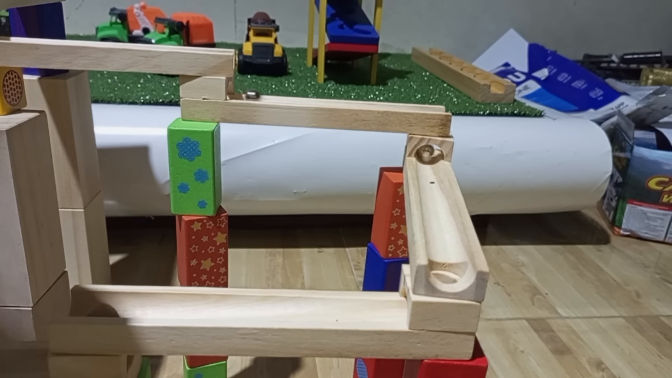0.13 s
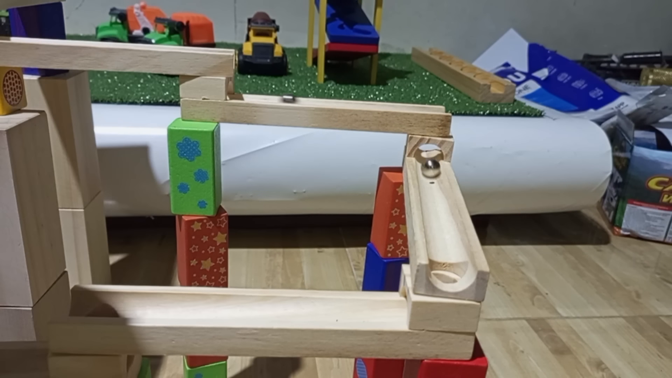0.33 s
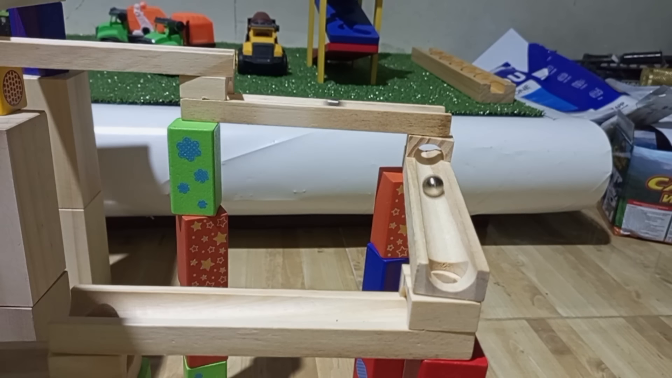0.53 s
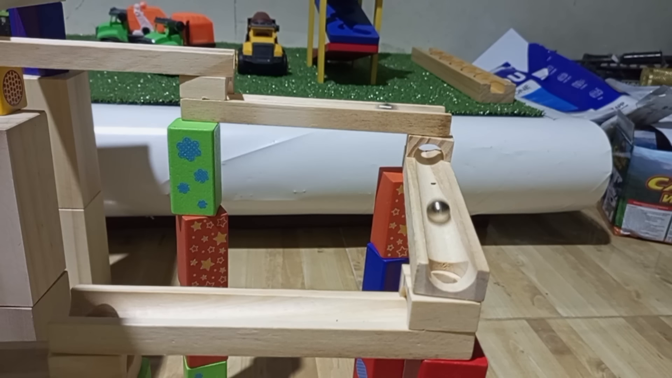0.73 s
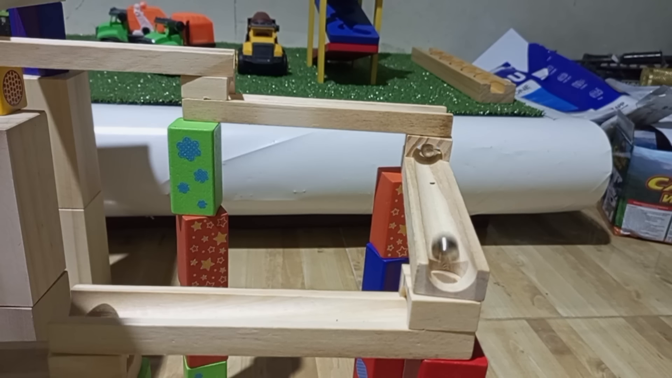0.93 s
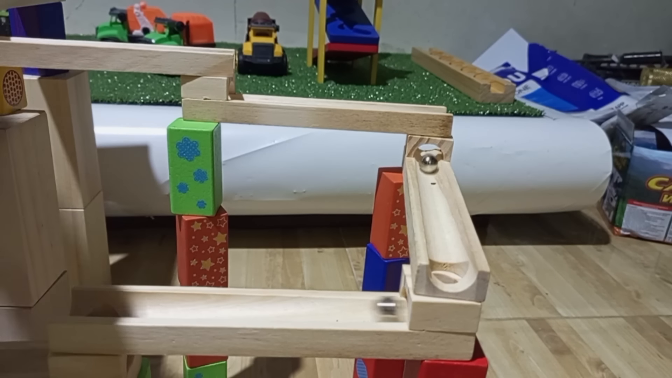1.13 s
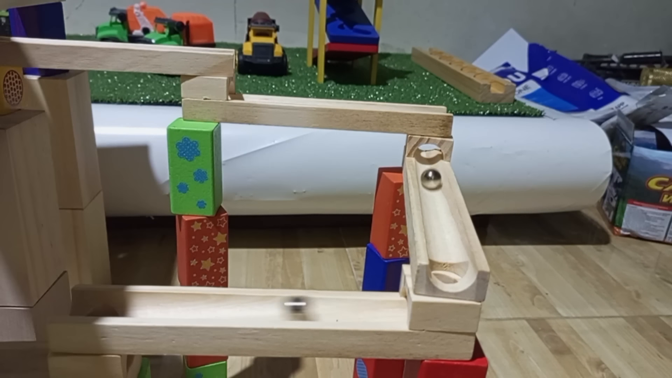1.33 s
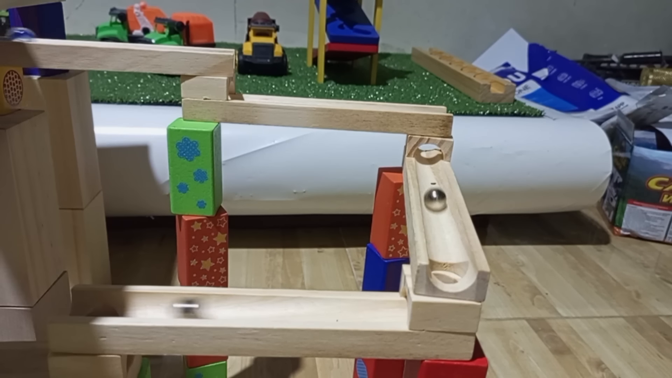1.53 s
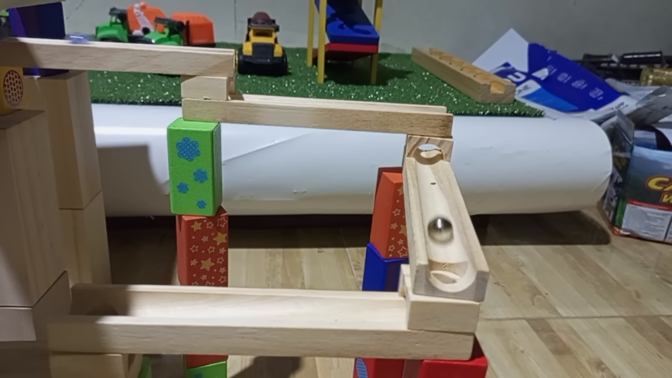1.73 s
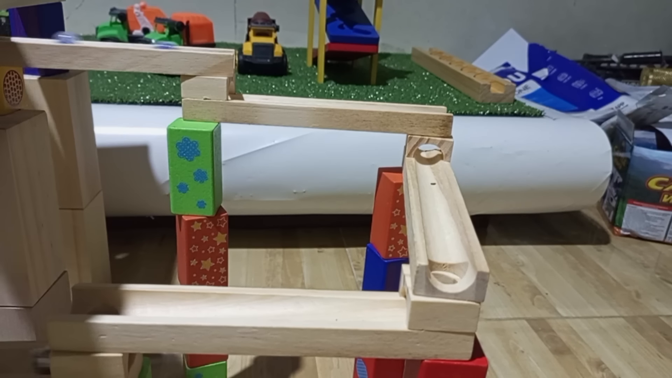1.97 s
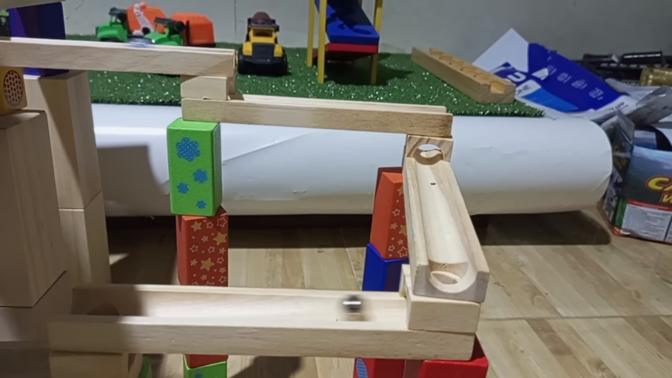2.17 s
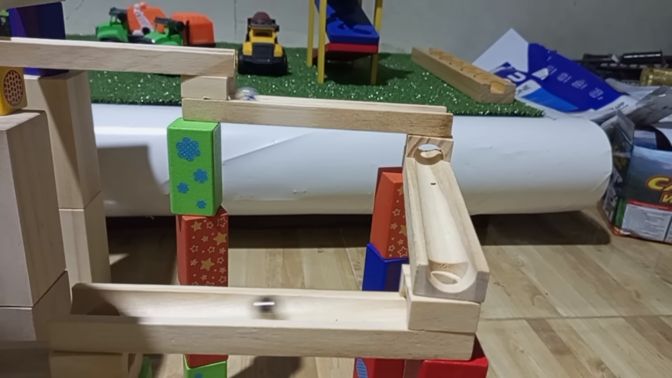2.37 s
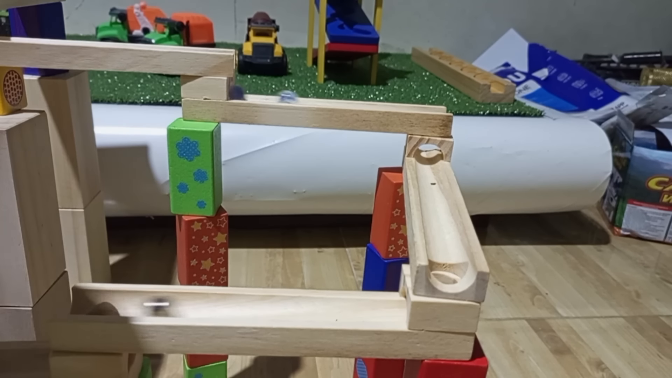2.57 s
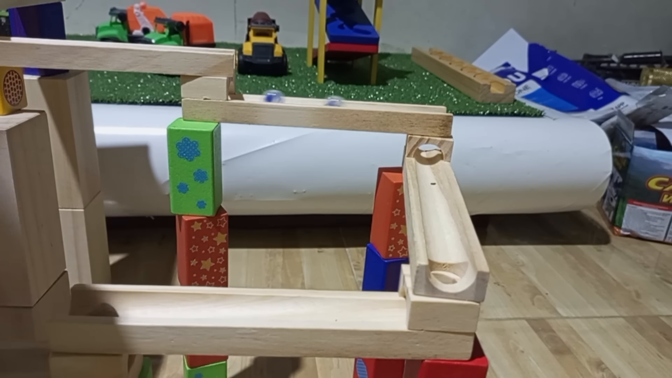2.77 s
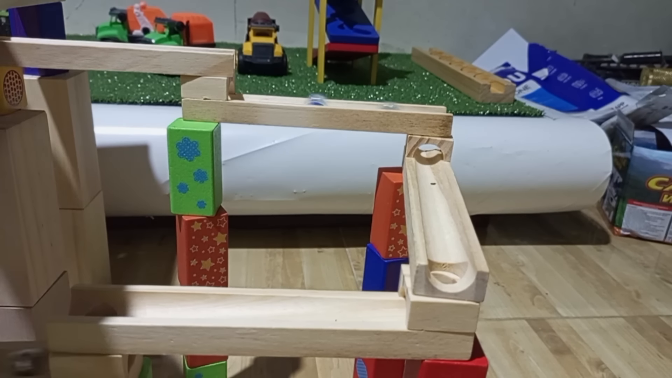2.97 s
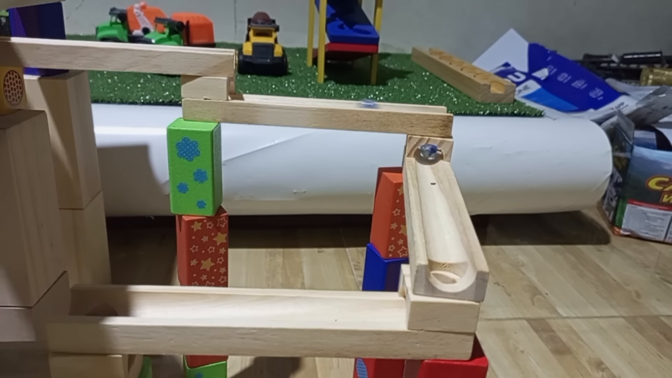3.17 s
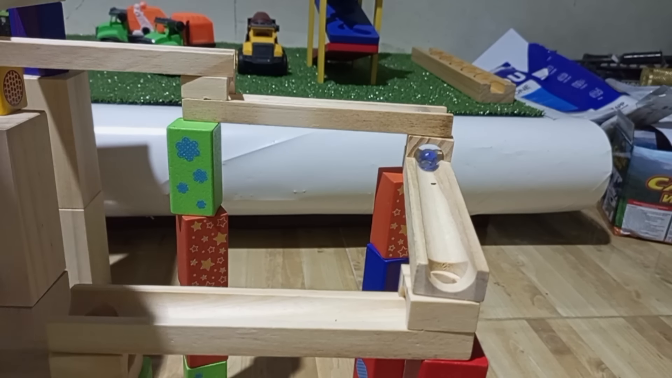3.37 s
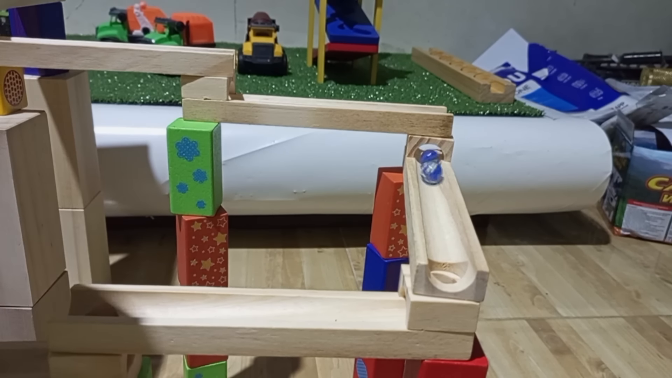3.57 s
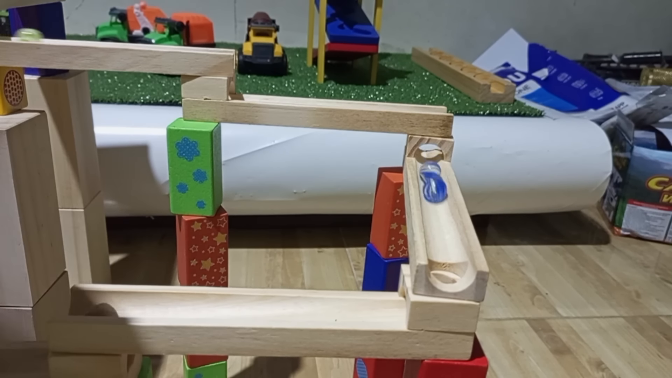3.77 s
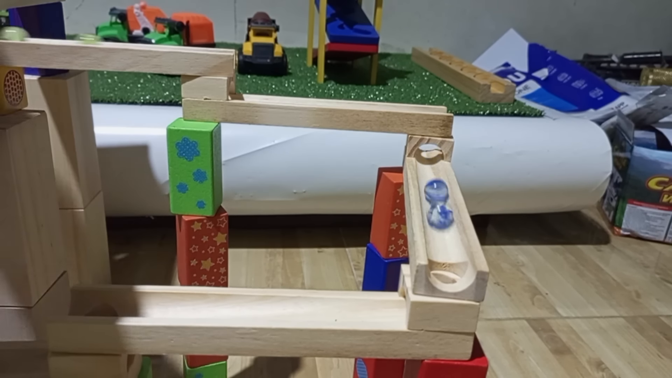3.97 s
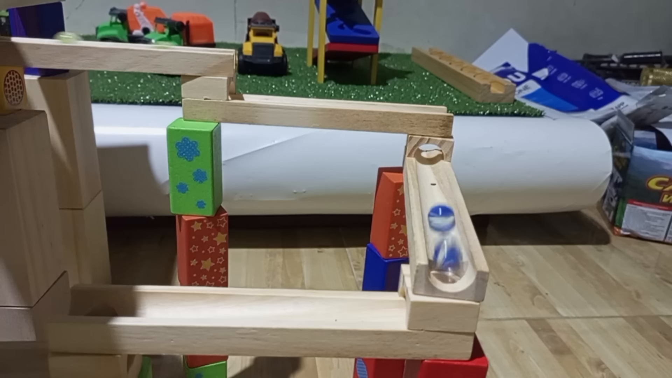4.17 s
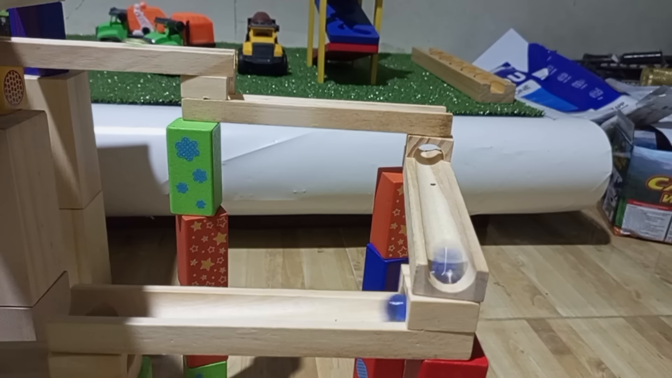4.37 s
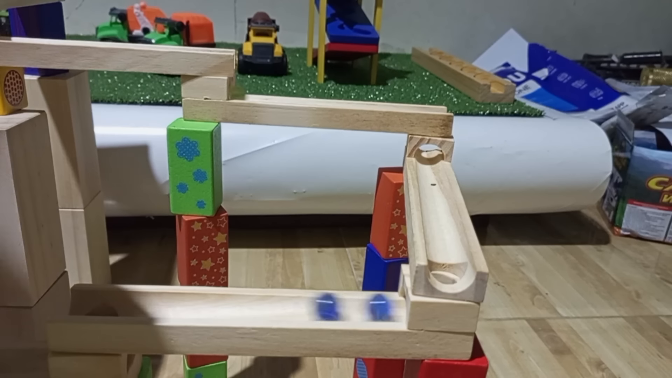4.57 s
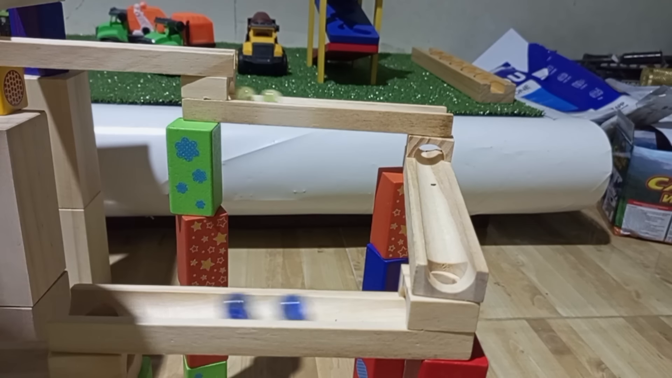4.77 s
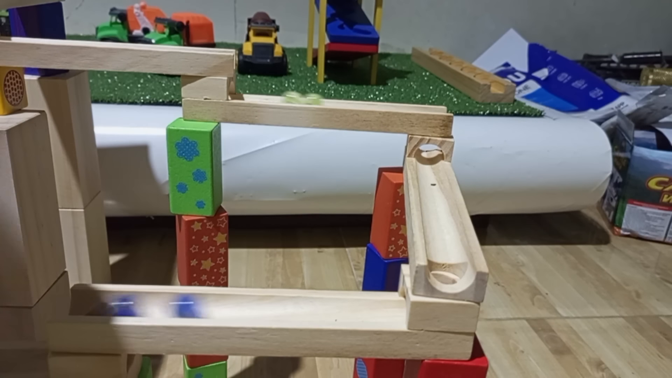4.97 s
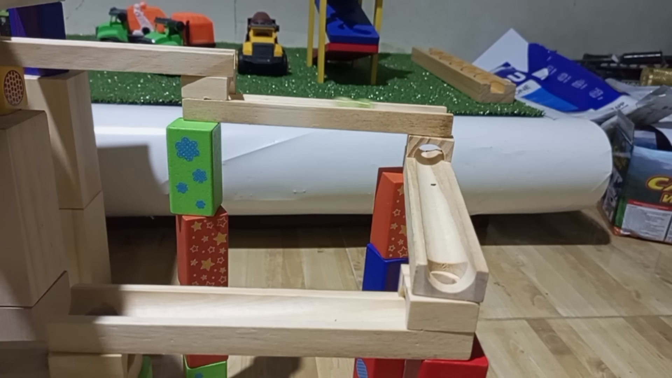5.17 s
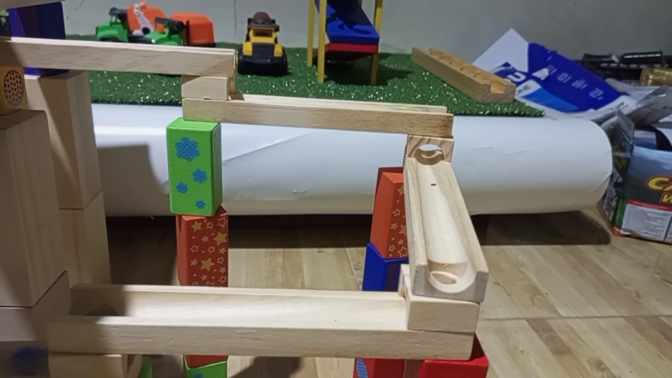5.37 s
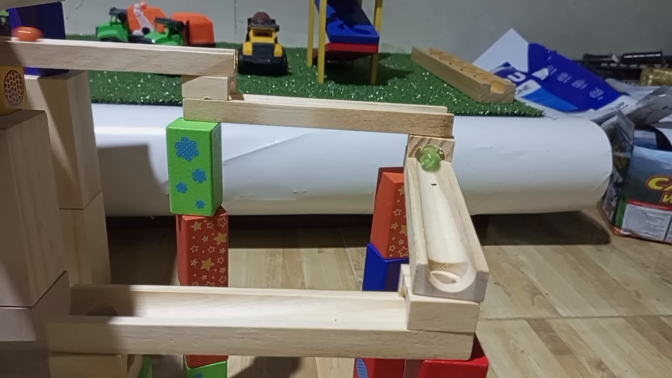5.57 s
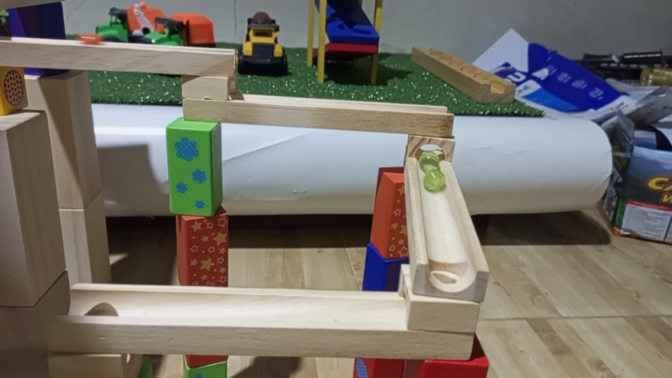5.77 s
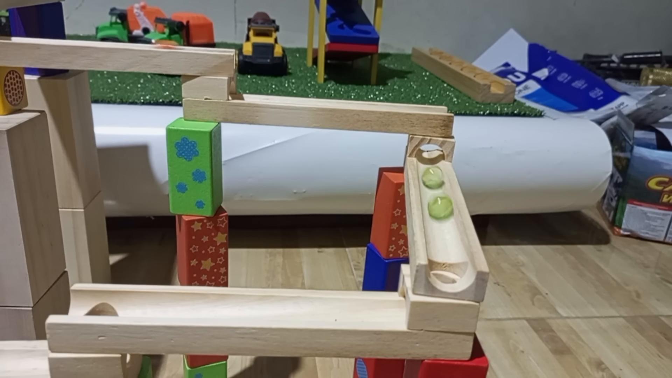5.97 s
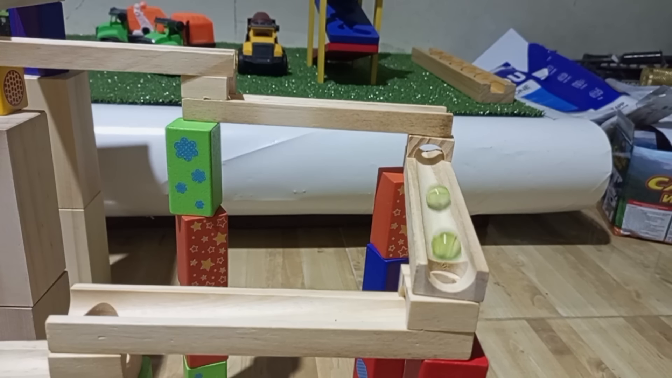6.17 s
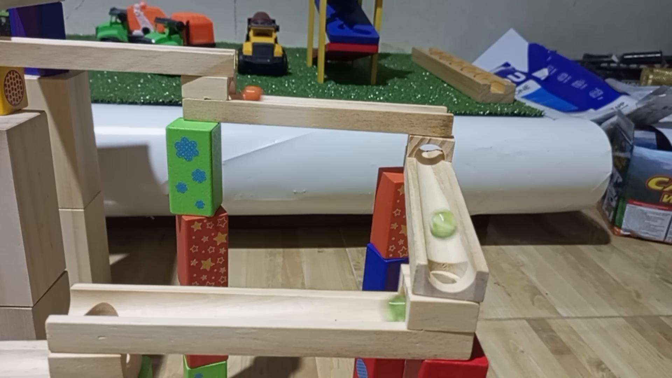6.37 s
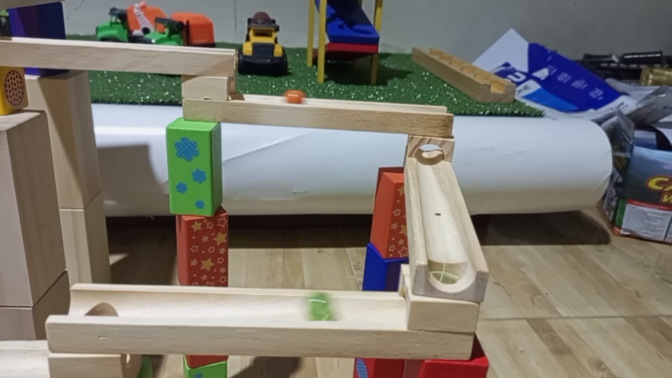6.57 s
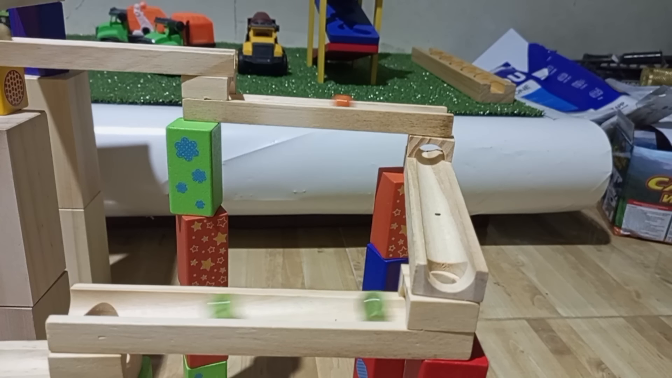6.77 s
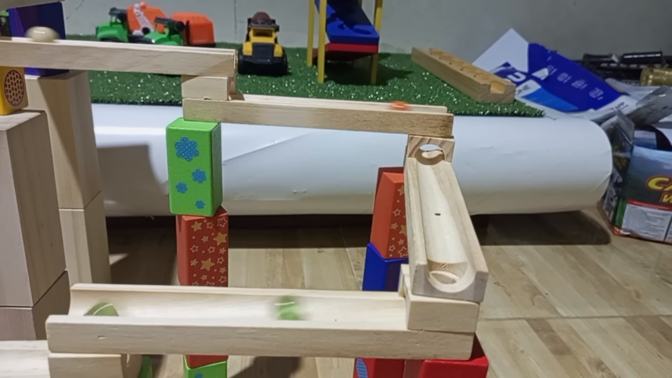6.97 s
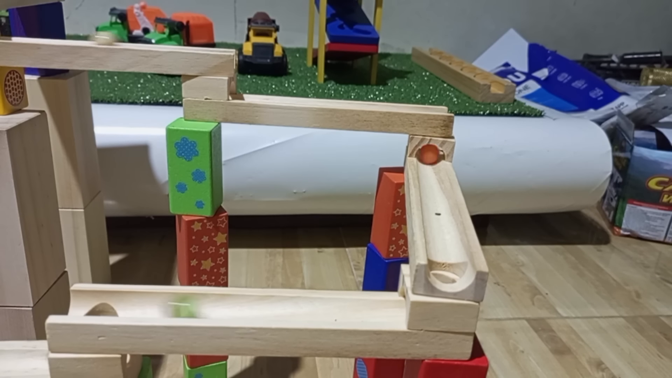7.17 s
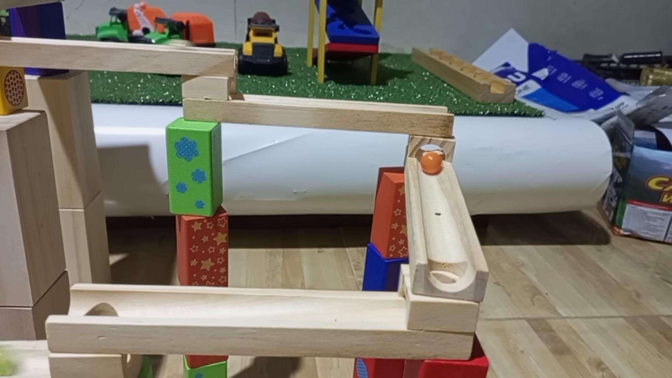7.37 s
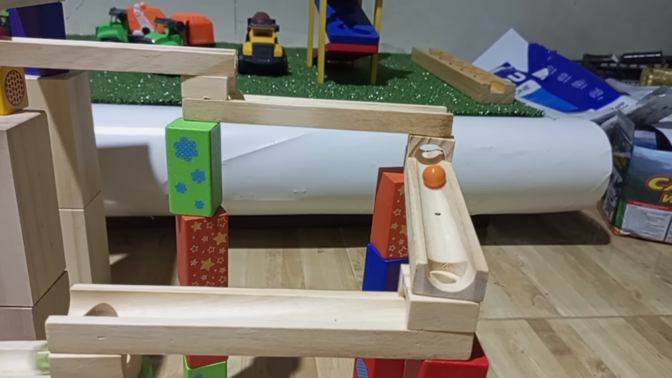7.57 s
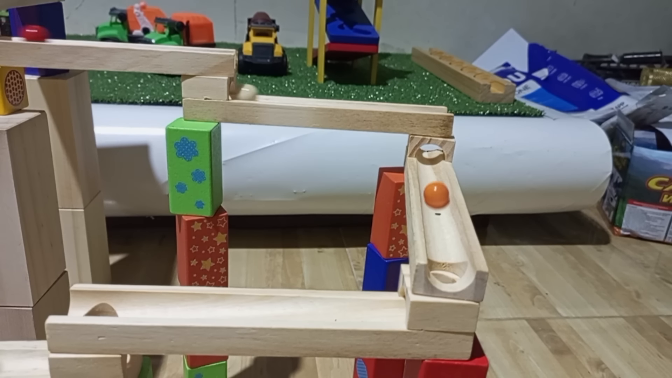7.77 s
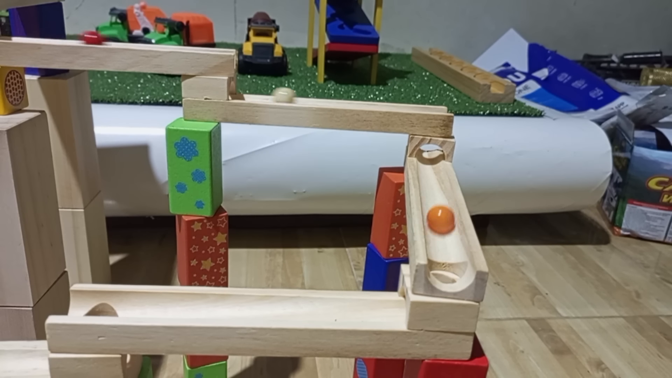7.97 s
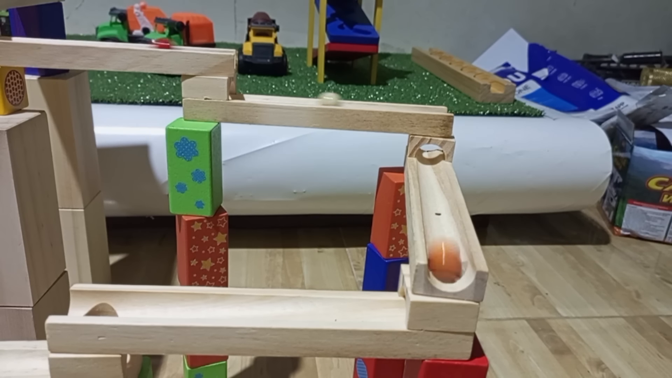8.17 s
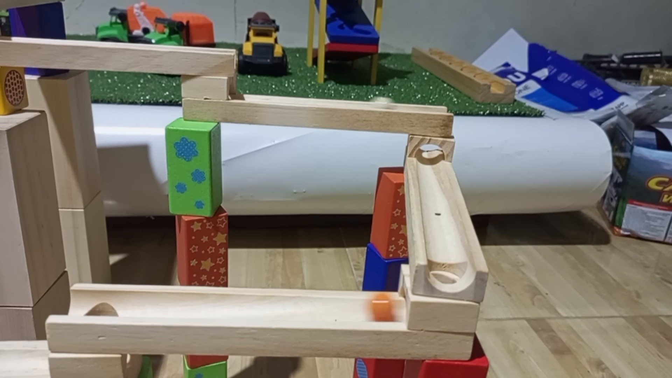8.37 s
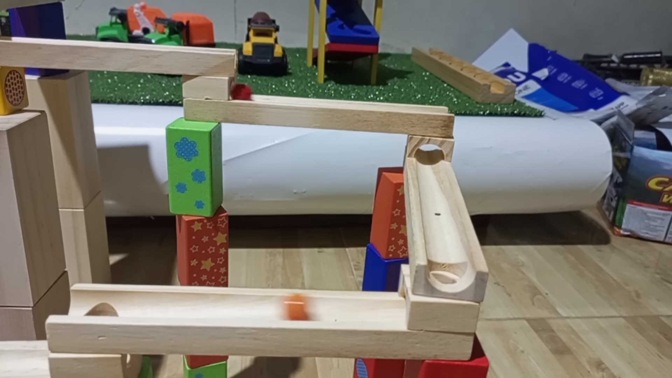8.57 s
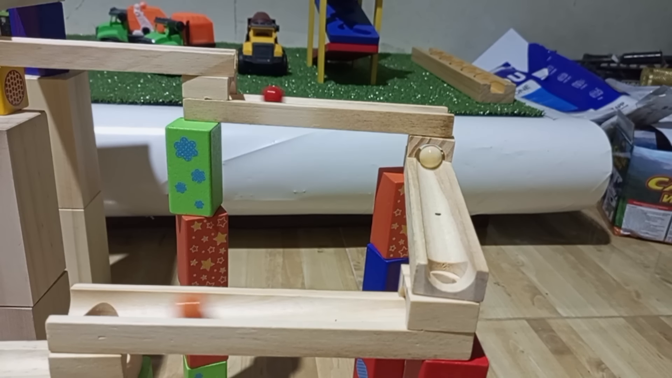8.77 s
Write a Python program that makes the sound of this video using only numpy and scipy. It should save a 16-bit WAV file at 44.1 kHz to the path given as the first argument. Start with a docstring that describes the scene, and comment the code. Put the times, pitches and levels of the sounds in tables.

```python
"""A hard-walled room, with glass marbles running down a wooden marble run.
Landings ring damped wood modes over noise; a low boom follows, with grazes and rebounds around each.
Bored blocks pop on one short air note, groove walls tap, and thin bright clicks join some landings.
Coloured noise makes the rolling rumble and the quiet of the room, and two rails drone.
Decaying noise is the room's answer, and the recorder's limiter holds the sharpest peaks down."""
import sys
import numpy as np
from scipy import signal
from scipy.fft import rfft, irfft, next_fast_len
from scipy.io import wavfile
from scipy.ndimage import uniform_filter1d, minimum_filter1d, map_coordinates

SR = 44100
rng = np.random.default_rng(int(sys.argv[2]) if len(sys.argv) > 2 else 0)


def generate_wav(signal):
    """Clip the signal to [-1, 1] and save it as 16-bit WAV at the path in sys.argv[1]."""
    frames = np.transpose(np.atleast_2d(signal))
    scaled = np.clip(frames, -1, 1) * 32767
    pcm = np.round(scaled).astype(np.int16)
    wavfile.write(sys.argv[1], SR, pcm)


N = 388515  # samples
HIT = np.arange(SR // 8) / SR  # time within one blow, s
DETUNE = 0.004  # spread of a mode's pitch, as a share of it

# marbles landing on the rails and blocks: start_s, level_db, part_index, contact_hardness_db
LANDINGS = [(0.237, -29.5, 0, -22.5), (0.2923, -28.5, 0, 6), (0.6428, -30, 0, -17.5),
            (0.7035, -31.5, 0, -9.5), (1.064, -15.5, 1, -14), (1.22, -24.5, 2, 2.5), (1.5895, -23, 2, 5.5),
            (1.729, -24, 1, 0), (1.7763, -17, 5, -4), (1.9738, -18, 1, -2), (2.1278, -25.5, 6, 2),
            (2.175, -21.5, 5, -13), (2.4385, -22.5, 4, -7.5), (2.6829, -17.5, 7, -5), (2.711, -25, 0, 3),
            (2.7737, -20, 5, -6.5), (2.8583, -35, 0, 9), (3.278, -25, 0, -0.5), (3.4438, -23.5, 2, 2),
            (3.6305, -18.5, 6, -1.5), (3.7058, -26, 2, 1.5), (4.3117, -16, 1, 1), (4.37, -21.5, 4, 1.5),
            (4.3859, -17.5, 4, 5), (4.487, -20.5, 1, 0.5), (4.543, -17.5, 6, 0), (4.62, -25, 4, -2.5),
            (4.763, -22.5, 3, 1), (5.1208, -22, 5, -2), (5.2306, -23.5, 4, -1.5), (5.319, -24.5, 2, -0.5),
            (5.4648, -24.5, 0, -1), (5.537, -19.5, 6, 1), (5.7116, -23.5, 5, -24), (5.7745, -23.5, 7, 0),
            (6.0114, -21.5, 7, 1), (6.1742, -25, 4, -4), (6.3314, -22, 1, 0), (6.367, -22.5, 1, -9),
            (6.4801, -22, 0, -0.5), (6.531, -20.5, 2, 4.5), (6.662, -20.5, 1, 0), (6.7103, -21.5, 6, 4.5),
            (6.9315, -26, 7, 2), (7.089, -23, 4, -6.5), (7.4254, -18, 5, -4.5), (7.439, -23.5, 2, -7),
            (7.545, -20.5, 4, -10), (7.964, -28.5, 3, -6.5), (8.3024, -20, 1, 1), (8.397, -20.5, 4, -13.5),
            (8.7519, -29, 6, -15)]
# how each part answers a blow: low_mode_db, ring_over_clatter_db, room_share_db, tower_boom_db
PART_VOICING = [(-6, -2, -9.5, -13), (-6.5, 4, -10, -29), (-3, 5, -10, -24), (0, 1, -9, -24),
                (-8.5, -4, -12.5, -25), (-7, -6.5, -10.5, -20), (-7, -8, -8.5, -21), (-8, -4.5, -10, -30)]
# spectrum of a glancing contact: frequency_hz, relative_level_db
GLANCING_SPECTRUM = [(60, -39), (200, -3.5), (700, -4.5), (2200, 4.5), (6000, -3.5), (8500, -33.5),
                     (14000, -36)]
# spectrum of a bright crack: frequency_hz, relative_level_db
CRACK_SPECTRUM = [(5000, -21), (7300, -14), (9000, -4.5), (10500, 5), (13700, -12), (15000, -8)]


def amp(db):
    """Decibels to gain."""
    return 10 ** (np.asarray(db) / 20)


def unit(x):
    """Scale to rms 1."""
    return x / np.sqrt(np.mean(x ** 2) + 1e-20)


def strike(x):
    """Scale a blow to rms 1 over its first hundredth of a second."""
    return x / np.sqrt(np.mean(x[:SR // 100] ** 2) + 1e-20)


def along(points, hz):
    """Read (Hz, value) points at any frequency, straight lines on a log axis."""
    point_hz, values = np.transpose(points)
    return np.interp(np.log(hz + 1), np.log(point_hz), values)


def coloured(size, spectrum):
    """Noise of rms 1, its white spectrum shaped to the given levels."""
    padded = next_fast_len(size)
    gain = amp(along(spectrum, np.fft.rfftfreq(padded, 1 / SR)))
    noise = irfft(rfft(rng.standard_normal(padded)) * gain, padded)
    return unit(noise[:size])


def wobble(rate):
    """A random curve of straight lines between knots, rate knots a second."""
    knots = rng.standard_normal(int(N * rate / SR) + 4)
    return map_coordinates(knots, [np.arange(N) * rate / SR], order=1)


def fade(t60, attack=0.00019):
    """Quick rise and exponential decay, both in seconds."""
    return amp(-60 * HIT / t60) * (1 - np.exp(-HIT / attack))


def mode(hz, t60, attack=0.0005):
    """One ringing resonance: a sine that dies exponentially."""
    return np.sin(2 * np.pi * hz * HIT) * fade(t60, attack)


def burst(spectrum, t60):
    """Many close, heavily damped modes, dying as noise."""
    return strike(coloured(len(HIT), spectrum) * fade(t60))


def cluster(modes, lo_hz, hi_hz, ring_db, ring_t60, dense_t60):
    """The leading modes of the wood ring among their damped neighbours."""
    band = [(lo_hz / 2, -45), (lo_hz, 0), (hi_hz, 0), (hi_hz * 1.425, -28), (hi_hz * 2, -55)]
    ring = np.zeros(len(HIT))
    # the marble's weight and the spot it hits vary each mode's level and pitch a little
    for hz in modes:
        level = amp(rng.normal(0, 1.7))
        ring += level * mode(hz * (1 + DETUNE * rng.normal()), ring_t60)
    return strike(amp(ring_db - 2.5) * strike(ring) + burst(band, dense_t60))


def room(x, gap=0.0055, build=0.0082):
    """The room's answer: noise dying at its own rate in each band, drawn anew for every sound."""
    # reverberation of the room: frequency_hz, t60_s
    reverberation = [(500, 0.61), (2000, 0.52), (5000, 0.56), (7000, 0.49), (15000, 0.48)]
    hz, t, grains = signal.stft(rng.standard_normal(SR * 2 // 3), SR, nperseg=256)
    decay = amp(-60 * t / along(reverberation, hz)[:, None])
    tail = signal.istft(grains * decay, SR, nperseg=256)[1]
    # the nearest walls answer first, after the gap (s)
    tail *= np.clip((np.arange(len(tail)) / SR - gap) / build, 0, 1)
    return signal.fftconvolve(x, tail / np.linalg.norm(tail))


def add(track, s, x):
    """Mix x into the track at time s; a sound begun earlier leaves only its tail."""
    start = round(s * SR)
    x, start = x[max(-start, 0):], max(start, 0)
    track[start:start + len(x)] += x[:max(N - start, 0)]


def knocks(room_db=6):
    """Each landing rings three groups of modes; hard contacts gain treble and crack, gentle ones are duller."""
    # the rails and blocks: low_mode_hz, main_mode_hz, then
    # two further modes of the part, in no fixed order: further_mode_hz, other_further_mode_hz
    part_modes = [(1594, 2580, 6900, 6600), (1675, 4200, 5530, 6900), (1888, 3770, 5600, 5200),
                  (2030, 3830, 4500, 6000), (2353, 3300, 5700, 6100), (1678, 2960, 4500, 3600),
                  (1568, 3800, 2400, 5830), (1950, 2680, 4780, 6300)]
    # spectrum of the tower's thud: frequency_hz, relative_level_db
    thud_spectrum = [(40, -49.5), (130, -18), (200, 0.5), (500, 1), (1100, 1), (1700, -5.5), (4000, -59.5)]
    usual_db = -24.5  # an ordinary landing
    thud_db, bass_lag = -13, 0.23  # dB the bass falls behind per dB of level
    crack_db, crack_grows = -20.5, 0.83  # dB the crack gains per dB of hardness
    # dB of room lost per dB of level (loud is near), and gained per dB of hardness
    room_lag, room_grows = 0.36, 0.1
    out = np.zeros(N)
    for s, db, part, hard_db in LANDINGS:
        low_hz, main_hz, *further_hz = part_modes[round(part)]
        low_db, ring_db, wet_db, _ = PART_VOICING[round(part)]
        force_db = db - usual_db
        low = amp(low_db) * cluster([low_hz], 1300, 2060, ring_db + 7, ring_t60=0.044, dense_t60=0.019)
        main = cluster([main_hz], 2450, 4090, ring_db, ring_t60=0.033, dense_t60=0.026)
        further = amp(hard_db) * cluster(further_hz, 4490, 6140, ring_db, ring_t60=0.025, dense_t60=0.02)
        crack = amp(crack_db + crack_grows * hard_db) * burst(CRACK_SPECTRUM, t60=0.019)
        thud = amp(thud_db) * burst(thud_spectrum, t60=0.078)
        bass = amp(-bass_lag * force_db) * (low + thud)
        blow = amp(db) * (main + further + crack + bass)
        add(out, s, blow)
        send_db = room_db + wet_db - room_lag * force_db + room_grows * hard_db
        add(out, s, amp(send_db) * room(blow))
    return out


def booms(rise_s=0.0088, t60=0.25, boom_grows=0.3):
    """A landing rocks the blocks underneath, harder contacts more: a low noise bloom after the knock."""
    # spectrum of the swaying tower of blocks: frequency_hz, relative_level_db
    tower_spectrum = [(60, -38.5), (150, -17.5), (195, 1), (300, -6), (450, -12.5), (1500, -54)]
    out, t = np.zeros(N), np.arange(SR // 3) / SR
    swell = amp(-60 * t / t60) * (1 - np.exp(-t / rise_s))
    for s, db, part, hard_db in LANDINGS:
        *_, boom_db = PART_VOICING[round(part)]
        level = amp(db + boom_db + boom_grows * hard_db)
        add(out, s, level * swell * coloured(len(t), tower_spectrum))
    return out


def rebounds(rel_db=-14, scatter_db=2.0, soonest=0.012, latest=0.055, count=2):
    """After each landing the marble skips between the groove walls: noise bursts at random delays (s)."""
    out = np.zeros(N)
    for s, db, *_ in LANDINGS:
        for delay in rng.uniform(soonest, latest, count):
            level = amp(db + rel_db + scatter_db * rng.normal())
            add(out, s + delay, level * burst(GLANCING_SPECTRUM, t60=0.016))
    return out


def grazes(rel_db=-17, scatter_db=2, lead_s=0.034, spread_s=0.0066):
    """Just before it lands, a marble brushes the edge it falls from: a soft noise burst."""
    out = np.zeros(N)
    for s, db, *_ in LANDINGS:
        touch_s = s - lead_s + spread_s * rng.normal()
        level = amp(db + rel_db + scatter_db * rng.normal())
        add(out, touch_s, level * burst(GLANCING_SPECTRUM, t60=0.025))
    return out


def pops(air_db=1.5, wood_db=-9, air_room_db=-13, wood_room_db=-2, mode_scatter_db=2.5):
    """The hollow sings one short note out of its hole, while the wood around it radiates into the room."""
    # marbles striking inside a bored block: start_s, level_db
    hollow_strikes = [(0.1345, -26), (0.147, -13), (0.9128, -32.5), (0.9699, -16.5), (1.9441, -33),
                      (3.1507, -37), (3.208, -15), (3.471, -16.5), (5.1976, -20.5), (5.4386, -29),
                      (5.4506, -26.5), (5.4896, -14), (5.5907, -13), (6.174, -20.5), (6.6335, -23.5),
                      (7.1293, -29.5), (7.1773, -16), (8.2646, -34), (8.591, -25), (8.686, -15.5)]
    # modes of the bored block, its air hollow first: frequency_hz, level_db, t60_s
    block_modes = [(3108, -0.5, 0.028), (2247, -22.5, 0.068), (1674, -26.5, 0.036), (3646, -17.5, 0.025),
                   (5104, -16.5, 0.032)]
    out = np.zeros(N)
    (air_hz, hollow_db, air_t60), *wood_modes = block_modes
    for s, db in hollow_strikes:
        note_hz = air_hz * (1 + DETUNE * rng.normal())
        air = amp(hollow_db) * strike(mode(note_hz, air_t60, attack=0.0027))
        wood = amp(wood_db) * burst(GLANCING_SPECTRUM, t60=0.018)
        for hz, mode_db, t60 in wood_modes:
            wood += amp(mode_db + rng.normal(0, mode_scatter_db)) * strike(mode(hz, t60))
        add(out, s, amp(db) * (amp(air_db) * air + wood))
        add(out, s, amp(db) * room(amp(air_room_db) * air + amp(wood_room_db) * wood))
    return out


def taps(ring_db=-1, room_db=-5):
    """A glancing touch rings one mode over a dull click."""
    # light bounces against the groove walls: start_s, level_db, mode_hz; the first row, at a negative time, is
    # an earlier landing begun before the scene, of which only the room's dying answer is heard
    wall_bounces = [(-0.11, -21, 3810), (1.1133, -26, 3960), (1.5468, -35.5, 1920), (1.7471, -25, 3330),
                    (1.826, -25, 3220), (2.023, -24.5, 1680), (2.4216, -30, 3920), (2.4883, -29, 4050),
                    (2.6536, -34, 2880), (2.6828, -22.5, 2290), (2.8333, -24, 2940), (3.168, -39.5, 3410),
                    (3.409, -35, 3460), (3.6032, -35.5, 3030), (3.6259, -23.5, 2870), (3.7498, -31.5, 3700),
                    (4.271, -27.5, 3160), (4.4211, -25.5, 4060), (4.4972, -27, 4180), (4.6642, -22.5, 3800),
                    (4.7062, -26, 4000), (4.7275, -25, 2330), (4.806, -26.5, 2010), (5.0885, -25, 3350),
                    (5.1703, -32, 3160), (5.185, -30.5, 3300), (5.2142, -25.5, 2960), (5.6554, -18.5, 1570),
                    (5.976, -26, 2410), (6.217, -27.5, 3990), (6.3142, -26, 2530), (7.0545, -33, 2610),
                    (7.099, -27.5, 5030), (7.3851, -25.5, 2630), (7.68, -30.5, 2020), (7.716, -23, 4440),
                    (7.761, -25, 2030), (8.0069, -33, 4400), (8.2886, -24.5, 4450), (8.3338, -27.5, 3540)]
    out = np.zeros(N)
    for s, db, hz in wall_bounces:
        ring = amp(ring_db) * strike(mode(hz, t60=0.033))
        tap = amp(db) * strike(ring + burst(GLANCING_SPECTRUM, t60=0.022))
        add(out, s, tap)
        add(out, s, amp(room_db) * room(tap))
    return out


def bright_clicks(room_db=2):
    """Thin bright clicks, most of them together with a landing: short treble noise that carries in the room."""
    # thin bright clicks, most of them together with a landing: start_s, level_db
    click_levels = [(1.22, -46.5), (1.7292, -41), (3.6304, -40), (5.195, -45), (5.537, -40), (7.0884, -46),
                    (7.3614, -45), (7.4237, -43.5), (7.775, -45)]
    out = np.zeros(N)
    for s, db in click_levels:
        click = amp(db) * burst(CRACK_SPECTRUM, t60=0.014)
        add(out, s, click)
        add(out, s, amp(room_db) * room(click))
    return out


def rolling(bumps_db=2.5):
    """The grain of the wood shakes the rolling marbles: uneven groove noise, and rails that drone."""
    # marbles rolling in the grooves: time_s, level_db
    roll_levels = [(0, -56), (1.4, -49.5), (2.6, -53.5), (4.1, -58), (4.5, -55), (6, -54.5), (8.8, -55.5)]
    # spectrum of the grooves: frequency_hz, relative_level_db
    groove_spectrum = [(40, -40), (100, -8.5), (175, 8.5), (260, 0), (800, -2), (1600, -22), (5000, -22),
                       (8000, -44.5)]
    # low drones, as a rolling marble shakes a whole rail: start_s, end_s, pitch_hz, level_db
    rail_drones = [(2.058, 3.252, 167, -53), (7.11, 8.903, 79.7, -58.5)]
    t = np.arange(N) / SR
    level_db = np.interp(t, *np.transpose(roll_levels)) + bumps_db * wobble(35)
    out = amp(level_db) * coloured(N, groove_spectrum)
    for start, end, hz, db in rail_drones:
        progress = np.clip((t - start) / (end - start), 0, 1)
        swell = np.sqrt(np.abs(np.sin(np.pi * progress)))
        phase = 2 * np.pi * hz * t
        # two slow random curves make the drone's level and phase wander
        drone = unit(wobble(9.2) * np.sin(phase) + wobble(8.3) * np.cos(phase))
        out += amp(db) * swell * drone
    return out


def quiet(level_db=-57):
    """The quiet of the room: steady coloured noise."""
    # spectrum of the quiet room: frequency_hz, relative_level_db
    quiet_spectrum = [(25, -9), (75, 6), (200, 12), (600, -7.5), (6000, -21.5), (9000, -35.5)]
    return amp(level_db) * coloured(N, quiet_spectrum)


def scene():
    """The marble run over the quiet of the room, on one channel."""
    contacts = knocks() + booms() + rebounds() + grazes() + pops() + taps() + bright_clicks()
    return (contacts + rolling() + quiet())[None]


def record(dry, ceiling_db=-3.5, low_cut_hz=62, top_hz=15700):
    """A fast limiter, then the recorder's bass roll-off and band limit."""
    needed = np.minimum(1, amp(ceiling_db) / (np.abs(dry) + 1e-9))
    # the gain dips around each peak, smoothed over 65 samples
    gain = uniform_filter1d(minimum_filter1d(needed, size=65), size=65)
    low_cut = signal.butter(2, low_cut_hz, "high", fs=SR, output="sos")
    held = signal.sosfilt(low_cut, dry * gain)
    padded = next_fast_len(N + SR // 2)
    passed = np.fft.rfftfreq(padded, 1 / SR) < top_hz
    return irfft(rfft(held, padded) * passed, padded)[..., :N]


dry = scene()
out = record(dry)
generate_wav(out)
```